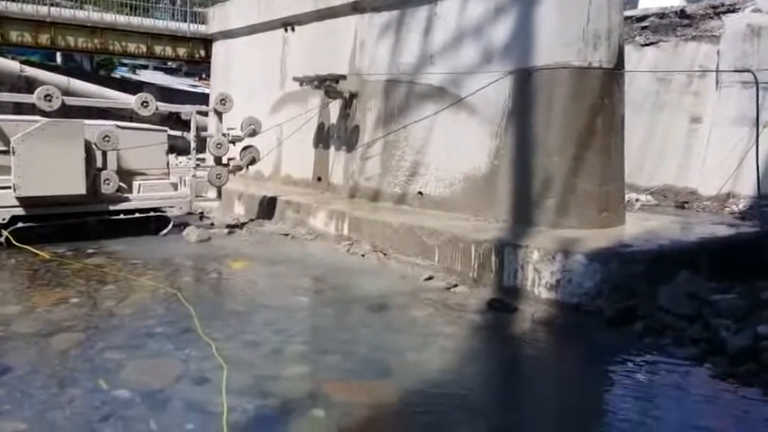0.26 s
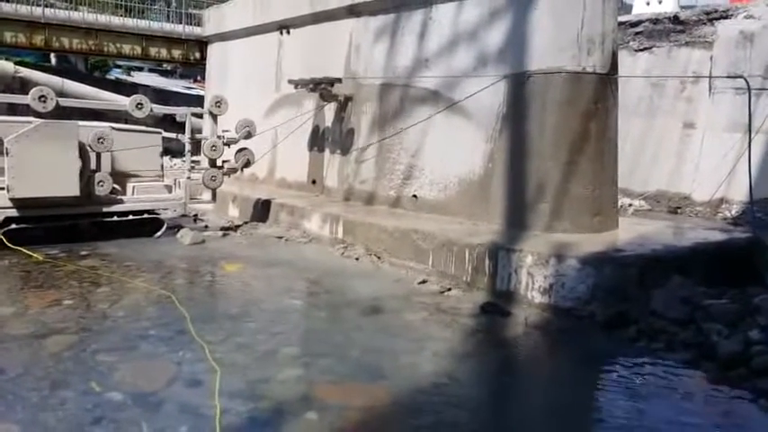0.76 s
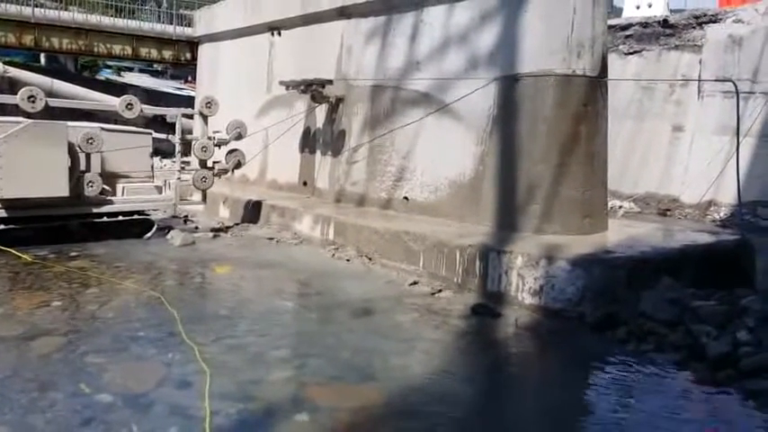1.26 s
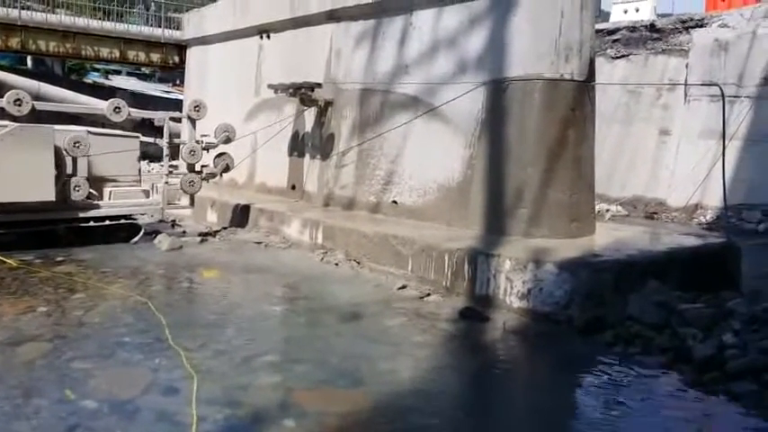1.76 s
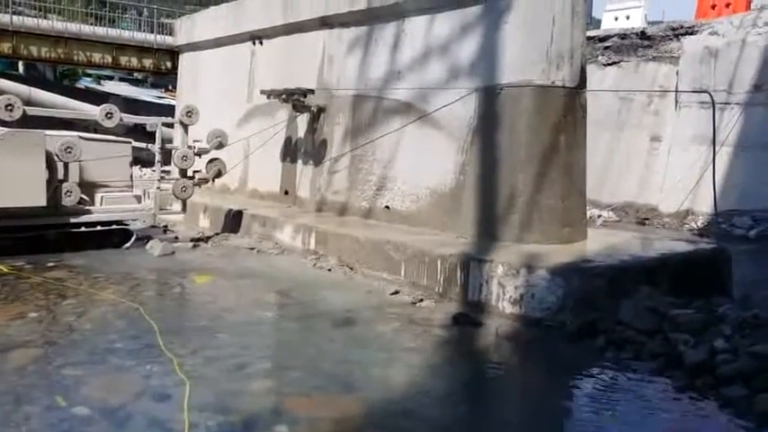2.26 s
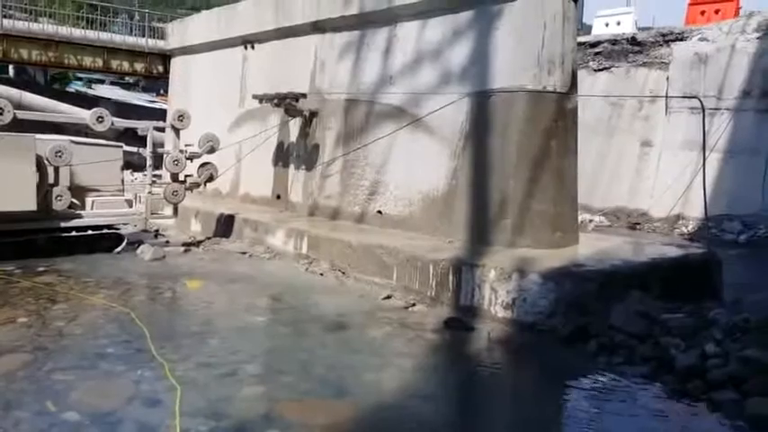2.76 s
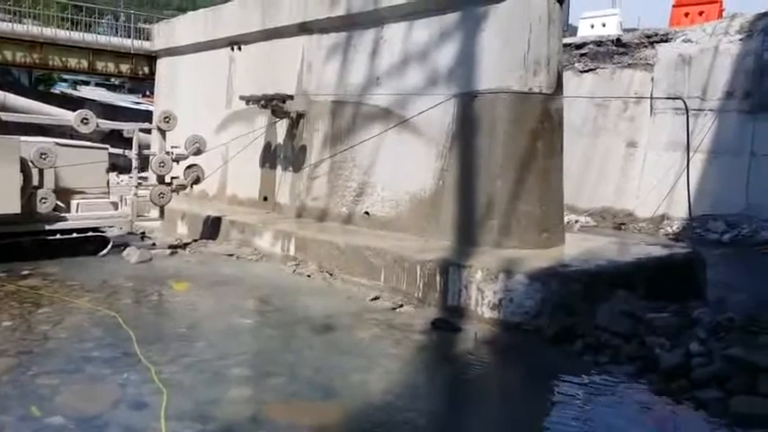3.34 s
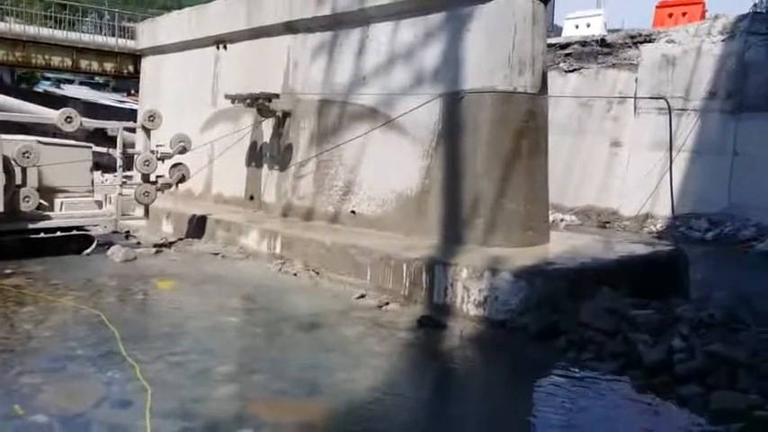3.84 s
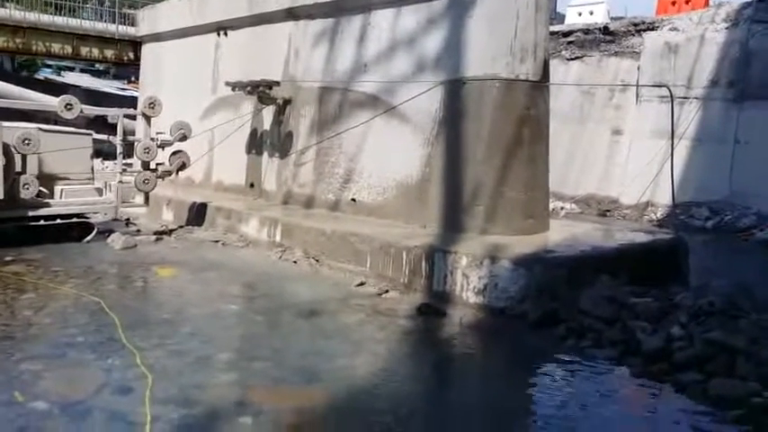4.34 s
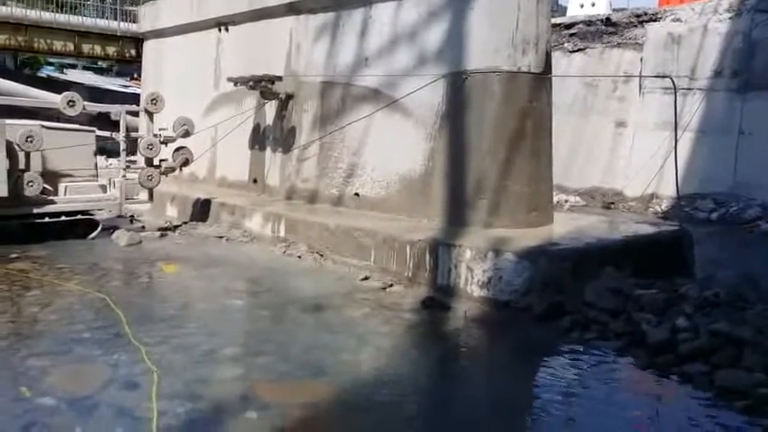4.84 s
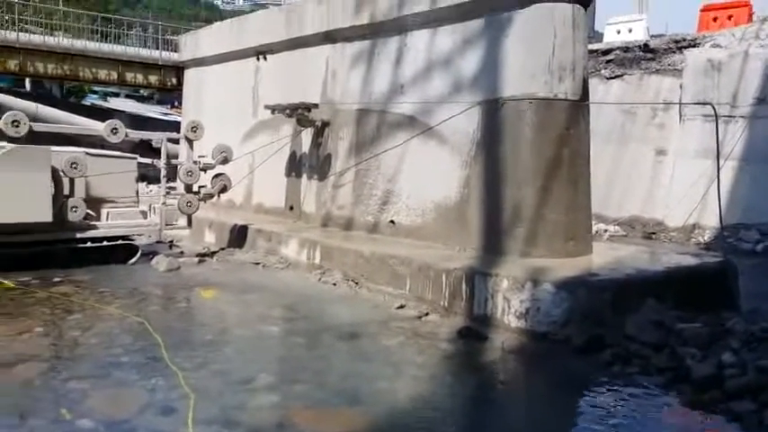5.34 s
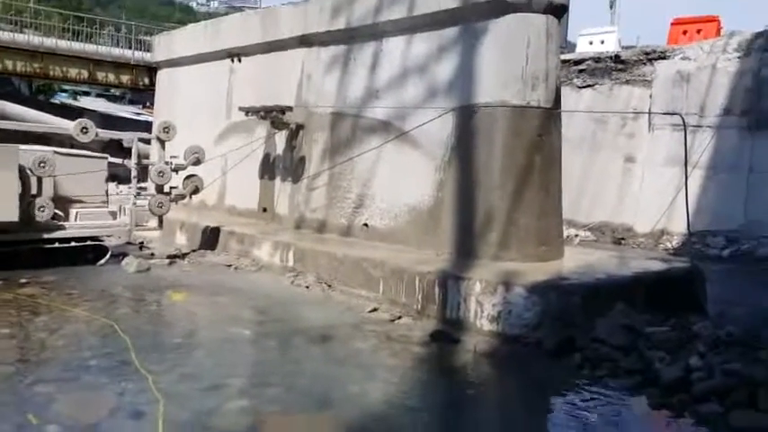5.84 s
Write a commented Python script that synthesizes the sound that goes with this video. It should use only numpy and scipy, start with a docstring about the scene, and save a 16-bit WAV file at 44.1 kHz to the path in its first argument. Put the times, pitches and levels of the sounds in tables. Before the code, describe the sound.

A wire saw's power pack whines steadily over a low engine roar while the wet wire grinds concrete with a dense, bright hiss.

```python
"""A fan's whine and its octave sound throughout, from the power pack of a diamond wire saw.
The saw cuts a concrete bridge pier across a shallow river, picked up at a left and a right microphone port.
One shaft turns the fan, low engine lines and a piston pump's whine, over roaring noise.
The wet wire is a dense hiss; the pulleys are rubbed resonances with short chirps and squeaks.
Near the end a finger slides over the right port, which ticks and goes dull."""
import sys
import numpy as np
from scipy import signal
from scipy.fft import rfft, irfft
from scipy.io import wavfile
from scipy.ndimage import uniform_filter1d

SR = 44100
rng = np.random.default_rng(int(sys.argv[2]) if len(sys.argv) > 2 else 0)


def pcm_store(signal):
    """Save signal as 16-bit PCM."""
    levels = np.round(np.clip(np.atleast_2d(signal), -1, 1) * 32767)
    wavfile.write(sys.argv[1], SR, levels.astype(np.int16).T)


N = 268128
TIME = np.arange(N) / SR
CRUISE_HZ = 376.5  # blade-passing pitch at cruising speed
FAN_PER_TURN = 10.627  # blade passes in one turn of the shaft


def gain_of(db):
    """Decibels to amplitude."""
    return 10 ** (np.asarray(db) / 20)


def evened(x):
    """Scales to rms 1."""
    return x / np.sqrt(np.mean(x ** 2) + 1e-20)


def read(rows, hz):
    """Each column of a spectrum table at the frequencies hz, along a logarithmic axis."""
    f, *columns = np.transpose(rows)
    return np.array([np.interp(np.log(hz + 1), np.log(f + 1), c) for c in columns])


def follow(rows, t=TIME):
    """Each column of a curve table at the times t."""
    s, *columns = np.transpose(rows)
    return np.array([np.interp(t, s, c) for c in columns])


def wander(rate_hz, size=4096):
    """A slow random curve, evened to rms 1, with little above rate_hz."""
    hz = np.fft.rfftfreq(size, TIME[-1] / size)
    slow = irfft(rfft(rng.standard_normal(size)) / np.sqrt(1 + (hz / rate_hz) ** 4))
    return np.interp(TIME, np.linspace(0, TIME[-1], size), evened(slow))


def burst(s, length, t=TIME):
    """A smooth hump that starts at s and lasts for length, both in seconds."""
    return np.sin(np.pi * np.clip((t - s) / length, 0, 1))


def bell(hz, centre_hz, width_hz):
    """The curve of one resonance, 1 at its centre and 1/2 at the edges of its width."""
    return 1 / (1 + (2 * (hz - centre_hz) / width_hz) ** 2)


def patches(shape, frames, bins):
    """Random patches of rms 1 over time and frequency."""
    over_time = uniform_filter1d(rng.standard_normal(shape), frames, 0)
    return evened(uniform_filter1d(over_time, bins, 1))


def grid(size):
    """Frame times (as a column) and bin frequencies of short-time spectra."""
    hop = size // 4
    return np.arange(0, N + size, hop)[:, None] / SR, np.fft.rfftfreq(size, 1 / SR)


def noise_pair(db, same, lag, size):
    """Left and right noise from a field in dB per Hz, their likeness, and the delay of the left port (s)."""
    t, hz = grid(size=size)
    a, b, c, d = rng.standard_normal((4, len(t), len(hz)))
    same = np.clip(same, -1, 1)
    shared = a + 1j * b
    left = shared * np.exp(-2j * np.pi * hz * lag)
    right = same * shared + np.sqrt(1 - same ** 2) * (c + 1j * d)
    spectra = np.array([left, right]) * gain_of(db) * np.sqrt(1.5 * SR / size)
    return signal.istft(np.swapaxes(spectra, 1, 2), nperseg=size, noverlap=size * 3 // 4)[1][:, :N]


def tone(turns, flutter, flutter_hz):
    """A complex line, its real part at rms 1 before random flutter shakes its level and phase."""
    shake = 1 + flutter * (wander(flutter_hz) + 1j * wander(flutter_hz))
    return np.sqrt(2) * np.exp(2j * np.pi * turns) * shake


def at_ports(line, left_db, right_db, lead_radians):
    """A line at both ports, with its phase at the left port advanced by lead_radians."""
    left = gain_of(left_db) * (line * np.exp(1j * lead_radians)).real
    return np.array([left, gain_of(right_db) * line.real])


SHADE_FROM_S, SHADE_TAKES_S = 5.02, 0.38


def shade(t=TIME):
    """How near the hand is to the ports, 0-1."""
    return np.clip((t - SHADE_FROM_S) / SHADE_TAKES_S, 0, 1)


# The hand close to the ports hollows one band and lifts the next: (centre [Hz], width [Hz], change [dB])
HAND = [(1410, 610, -1.5), (1870, 240, 2)]


def hand_db(hz, t=TIME):
    """Colour that reflection off the nearby hand gives to the sound at hz."""
    return shade(t) * sum(db * bell(hz, centre, width) for centre, width, db in HAND)


BLADE_DB, OCTAVE_DB = -18, -21  # before swell and port trims
# Slow swell of the blade tone: (time [s], level change [dB])
BLADE_SWELL = [(.1, 1.5), (.38, -2.5), (.8, -0.7), (1.3, -1), (1.9, 0.6), (3.5, 0), (4.1, 1.4), (4.5, -0.5),
               (5.1, -0.3), (5.4, -0.8), (6, 0)]
# Slow swell of its octave: (time [s], level change [dB])
OCTAVE_SWELL = [(.1, -1.2), (.35, 0.7), (.57, -2.5), (.95, 0.2), (2.3, 0), (2.8, .8), (3.3, -.9),
                (4.0, 1.3), (4.3, -0.5), (4.9, -.3), (5.45, -2), (5.85, -1.3)]


def fan(turns, waver_db=0.44, waver_hz=5):
    """Passing blades press the air into a tone and its octave, which flutters more."""
    blade_db = BLADE_DB + follow(BLADE_SWELL)[0] + waver_db * wander(waver_hz)
    octave_db = OCTAVE_DB + follow(OCTAVE_SWELL)[0] + waver_db * wander(waver_hz)
    blade = gain_of(blade_db) * tone(turns, flutter=.012, flutter_hz=12)
    octave = gain_of(octave_db) * tone(2 * turns, flutter=.04, flutter_hz=22)
    # each passing blade is a dip in pressure
    blade_ports = at_ports(-blade, -1.6, 1.0, lead_radians=0.35)
    return blade_ports + at_ports(-octave, 0.6, -.2, lead_radians=0.47)


# Engine lines before port trims: (multiple of the shaft speed [1], level [dB])
ENGINE = [(2, -53), (3, -42.5), (4, -62), (4.5, -41.5), (5, -37.5), (6, -43.5), (7, -37)]


def engine(turns):
    """Uneven firing gives low whole and half shaft orders, each wavering slowly."""
    lines = sum(gain_of(db) * tone(order * turns, flutter=0.36, flutter_hz=1.7) for order, db in ENGINE)
    return at_ports(lines, -.5, .5, lead_radians=0.085)


# While the engine lugs below cruising speed, the pump's overtones near LUG_HZ sing out
LUG_SAG_HZ, LUG_DB, LUG_HZ, LUG_WIDTH_HZ = 3.0, 12.5, 2520, 500
HAND_ON_TONES = 1.2  # the hand colours steady tones more deeply than hiss, by this factor
# Pump whine at the two ports before hand and lugging, a row for each multiple of the piston rate from 1 up:
# (left level [dB], right level [dB], lead of the left port [radians])
PUMP = [(-35.5, -30, 0.3), (-39.5, -41.5, -1.8), (-49, -38.5, 2.2), (-36.5, -37, 2.5), (-37, -57, 3.5),
        (-38.5, -41.5, 4), (-48, -43.5, -0.5), (-43.5, -52, 0.5), (-49, -37.5, 2.2), (-52, -47, 3.5)]


def pump(turns, pitch, count):
    """The pressure ripple of count pistons; reflections set each overtone's level and phase at each port."""
    out = np.zeros((2, N))
    lugging = np.clip((CRUISE_HZ - pitch) / LUG_SAG_HZ, 0, 1) ** 2
    for k, (left_db, right_db, lead) in enumerate(PUMP, 1):
        hz = k * count * CRUISE_HZ / FAN_PER_TURN
        lug_db = LUG_DB * lugging * bell(hz, LUG_HZ, LUG_WIDTH_HZ)
        line = tone(k * count * turns + rng.random(), flutter=.26, flutter_hz=8)
        line = line * gain_of(HAND_ON_TONES * hand_db(hz) + lug_db)
        out += at_ports(line, left_db, right_db, lead_radians=lead)
    return out


# The hand shortens the path of the reflections, so the ripples slide up by this share
RIPPLE_SHIFT, RIPPLE_FROM_S, RIPPLE_TAKES_S = 0.037, 5.9, 0.33
# Hiss at each port before trims: (frequency [Hz], left density [dB per Hz], right density [dB per Hz])
HISS = [(300, -78, -104), (1105, -65, -55), (1540, -56, -56.5), (2060, -61, -55.5), (2400, -63, -56),
        (3400, -62, -57.5), (3980, -61.5, -55.5), (5570, -63, -53.5), (6580, -58, -56), (7340, -55.5, -65),
        (8950, -64, -66), (10340, -67, -88), (11090, -68.5, -100), (14000, -98, -105)]
# Likeness of the hiss at the two ports: (frequency [Hz], correlation [-1 to 1])
HISS_SAME = [(1100, -0.78), (1550, -0.36), (1950, -0.23), (2300, 0.035), (2550, 0.15), (3100, -0.062),
             (3600, -0.19), (4600, 0.069), (6400, 0.067), (7600, -0.16), (9000, -0.041)]
# Narrow peaks and dips from reflections: (centre [Hz], width [Hz], left change [dB], right change [dB])
RIPPLES = [(3620, 190, 0, 0.2), (4100, 200, 1.5, -1), (4700, 300, 0.5, 1.5), (5140, 300, -0.5, -0.2),
           (5740, 150, 5.5, -1), (6760, 250, 1.4, -2.5), (7100, 130, -2, -4), (7220, 200, 3.5, 5),
           (7380, 130, -2.5, 2), (7940, 500, 1, 1)]
# Level of the hiss as the wire bites and eases: (time [s], level change [dB])
BITE = [(0.05, -0.5), (0.7, -0.3), (0.95, 0), (1.55, -0.2), (1.75, 0.2), (2.25, 1.0), (2.65, 0.0),
        (3.1, -1), (3.3, -0.2), (3.55, -0.5), (3.8, 1), (4.0, 0.3), (4.3, 0.1), (4.6, -0.4)]
# The finger near the ports makes a cavity that lifts or dims the hiss:
# (time [s], left change [dB], right change [dB], resonance [Hz])
CUPPING = [(4.6, 0.5, 0, 5770), (4.9, 4, 3, 5900), (5.05, 2.5, 1.5, 5950), (5.2, 1.5, 5, 6000),
           (5.37, 3.5, 5, 6000), (5.46, -2, 3, 5500), (5.58, 2, 1, 4670), (5.7, 5.5, -6, 4700),
           (5.82, 5, -4, 5000), (5.94, 7, -7, 5660), (6.06, 5, -12, 5960)]
# The passing finger shades the top of the hiss at the left port:
# (start [s], length [s], centre [Hz], width [Hz], change [dB])
SHADOW = (5.5, 0.2, 8200, 2600, -3.5)


def grinding(left_db=-0.2, right_db=-1.34, patch_db=0.97, grit_db=0.2, spit_db=0.54, cavity_octaves=0.5):
    """Countless diamond grains scratch wet concrete: noise shaped at each port, in random patches."""
    t, hz = grid(size=512)
    lift_left_db, lift_right_db, cavity_hz = follow(CUPPING, t)
    cavity = np.exp(-(np.log2((hz + 1) / cavity_hz) / cavity_octaves) ** 2)
    cavity_db = np.array([lift_left_db, lift_right_db]) * cavity
    bite_db = follow(BITE, t)[0]
    # spurts of slurry sway the top of the hiss most
    spit = np.interp(t, TIME, wander(21)) * hz / 8000
    shift = 1 + RIPPLE_SHIFT * np.clip((t - RIPPLE_FROM_S) / RIPPLE_TAKES_S, 0, 1)
    ripple_db = sum(np.multiply.outer(port_db, bell(hz, centre * shift, width))
                    for centre, width, *port_db in RIPPLES)
    field = read(HISS, hz)[:, None] + ripple_db + bite_db + spit_db * spit + cavity_db + hand_db(hz, t)
    s, length, shadow_hz, width, shadow_db = SHADOW
    field[0] += shadow_db * burst(s, length, t) * bell(hz, shadow_hz, width)
    field = field + patch_db * patches(spit.shape, 24, 14)
    hiss = noise_pair(field, read(HISS_SAME, hz), lag=0, size=512)
    return hiss * gain_of(np.array([[left_db], [right_db]]) + grit_db * wander(70))


SHADE_PULLEYS_DB = -3.5  # with the hand fully near
# The wire runs slack or pulls tight on the pulleys: (start [s], length [s], level change [dB])
TENSION = [(0.21, 0.68, -7), (1.7, 0.77, -2), (3.0, .7, 0), (4.38, 0.24, 0.5)]


def rubbing_db(t):
    """How strongly the wire is heard on the pulleys: more when tight, less when slack and behind the hand."""
    return sum(db * burst(s, length, t) for s, length, db in TENSION) + SHADE_PULLEYS_DB * shade(t)


RUB_DB = 0.5  # trim of the rubbed modes
# Modes of the steel pulleys before trims: (centre [Hz], width before squaring [Hz], density [dB per Hz])
PULLEYS = [(1094, 240, -56.5), (1245, 28, -52.5), (1796, 73, -59.5), (2233, 62, -55), (2350, 76, -55.5),
           (2423, 106, -54), (2685, 70, -60.5), (3520, 110, -68)]


def pulleys(left_db=-7.0, right_db=-1.0, waver_db=3, same=0.78, drift_share=0.015):
    """The running wire rubs the pulleys; their modes drift together in pitch, and swell and fade in patches."""
    t, hz = grid(size=2048)
    rub_db = RUB_DB + rubbing_db(t)
    drift = 1 + drift_share * np.interp(t, TIME, wander(3))
    ring = sum(gain_of(db) ** 2 * bell(hz, centre * drift, width) ** 2 for centre, width, db in PULLEYS)
    field = 10 * np.log10(ring + 1e-20) + rub_db + waver_db * patches((len(t), len(hz)), 14, 2)
    return noise_pair(field, same, lag=0, size=2048) * gain_of([[left_db], [right_db]])


# Length is scaled by 0.5-1.5 for each chirp, level is before spread and tension, glide is the steepest
STRANDS_PER_S, STRAND_S, STRAND_DB = 22, .13, -33
STRAND_HZ, STRAND_RANGE_HZ, STRAND_GLIDE_HZ_PER_S = 2400, 519.6, 290


def strands(spread_db=2.5, left_db=-3):
    """Beads on the wire catch in the pulley grooves: brief thin tones that glide a little, at random times."""
    out = np.zeros((2, N))
    for when, where, span, glide, force, lead in rng.random((round(STRANDS_PER_S * TIME[-1]), 6)):
        t = np.arange(0, STRAND_S * (.5 + span), 1 / SR)
        hz = STRAND_HZ + STRAND_RANGE_HZ * (where - .5) + STRAND_GLIDE_HZ_PER_S * (2 * glide - 1) * t
        level_db = STRAND_DB + spread_db * (2 * force - 1.5)
        line = np.hanning(len(t)) * np.exp(2j * np.pi * np.cumsum(hz) / SR) * gain_of(level_db)
        part = out[:, int(when * N):][:, :len(t)]
        chirp = at_ports(line, left_db, 0, lead_radians=np.pi * (lead - .5))
        part += chirp[:, :part.shape[1]]  # adds into out
    return out * gain_of(rubbing_db(TIME))


# The wire sings in a pulley groove: (start [s], length [s], pitch [Hz], level before hump and flutter [dB])
SQUEAKS = [(3.0, .7, 2355, -39), (4.46, .16, 2645, -37), (5.31, .1, 1800, -34.5)]


def squeaks(flutter=0.6):
    """Thin wavering tones that swell and fade as the wire rides up a pulley groove."""
    return sum(gain_of(db) * burst(s, length) * tone(hz * TIME, flutter, flutter_hz=45).real
               for s, length, hz, db in SQUEAKS)


ROAR_DB, SHADE_ROAR_DB = 1, -1.5  # trim, and change with the hand fully near
# Roar of exhaust and cooling air before trims: (frequency [Hz], density [dB per Hz])
ROAR = [(25, -80), (55, -68.5), (95, -61), (128, -49), (210, -47), (280, -47.5), (410, -49.5), (510, -58),
        (630, -49.5), (780, -50), (1000, -57), (1400, -66.5), (3000, -113)]
# Likeness of the roar at the two ports: (frequency [Hz], coherence [0-1])
SAME = [(25, .4), (70, 0.8), (170, 0.98), (330, 0.98), (500, 0.86), (700, 1), (900, 0.9), (1300, 0.99)]
# Hollow resonances of the power pack's housing: (centre [Hz], width [Hz], mean lift [dB])
HOUSING = [(136, 7.8, 1.5), (244, 14.5, 6), (312, 11, 2), (457, 13, 4)]


def roar(swell_db=0.72, drift_db=0.5, boom_share=0.29):
    """Turbulent exhaust and cooling air, swelling slightly; each housing resonance booms and eases by itself."""
    t, hz = grid(size=4096)
    housing_db = sum(db * bell(hz, centre, width) * (1 + boom_share * np.interp(t, TIME, wander(3)))
                     for centre, width, db in HOUSING)
    field = read(ROAR, hz) + housing_db + drift_db * patches((len(t), len(hz)), 8, 8)
    air = noise_pair(field, read(SAME, hz), lag=-0.00016, size=4096)
    level_db = ROAR_DB + SHADE_ROAR_DB * shade() + swell_db * wander(1.5)
    return air * gain_of(level_db) * gain_of([[-.65], [.35]])


# The finger taps the right port: (start [s], length [s], centre [Hz], width [Hz], level before hump [dB])
TAP = (5.551, .006, 3100, 1700, -22)


def tap():
    """A soft tick of banded noise as the finger seals the port."""
    s, length, hz, width, db = TAP
    spectrum = rfft(rng.standard_normal(N)) * bell(np.fft.rfftfreq(N, 1 / SR), hz, width)
    return gain_of(db) * burst(s, length) * evened(irfft(spectrum, N))


# Blade-passing pitch of the fan, which sags with the load: (time [s], pitch [Hz])
SPEED = [(0.0, 372.8), (0.15, 373.1), (0.55, 377.1), (1.85, 376.5), (2.15, 375.3), (2.6, 376.5),
         (3.6, 377.3), (4.2, 375.9), (4.8, 378.1), (5.65, 376.0), (6.08, 376.7)]


def scene():
    """Fan, engine and pump turn together; the wire hisses and rings above them."""
    pitch = follow(SPEED)[0]
    blades = np.cumsum(pitch) / SR
    shaft = blades / FAN_PER_TURN
    power_pack = fan(blades) + engine(shaft) + pump(shaft, pitch, count=9) + roar()
    return power_pack + grinding() + pulleys() + strands() + squeaks()


COVER_SHARE = 0.89  # muffled share of the right port at full cover
EDGE_HZ = 12400  # upper band limit
# The finger slides over the right port, then drops and nearly seals it: (time [s], share of full cover [0-1])
COVER = [(5.47, 0), (5.505, .3), (5.512, .8), (5.53, 1)]


def record(dry, muffle_hz=1150, treble_hz=3600):
    """The covered right port loses its treble; then a soft peak limiter and the band limit."""
    left, right = dry
    muffled = right
    for corner_hz in (muffle_hz, treble_hz):
        muffled = signal.lfilter(*signal.butter(1, corner_hz, fs=SR), muffled)
    cover = COVER_SHARE * follow(COVER)[0]
    ports = np.array([left, (1 - cover) * right + cover * muffled + tap()])
    # a soft knee rounds off the highest crests
    within = np.clip(ports, -.75, .75)
    ports = within + .17 * np.tanh((ports - within) / .17)
    band_limit = signal.firwin(255, EDGE_HZ, window=("kaiser", 9), fs=SR)
    return signal.oaconvolve(ports, band_limit[None], "same")


dry = scene()
out = record(dry)
pcm_store(out)
```